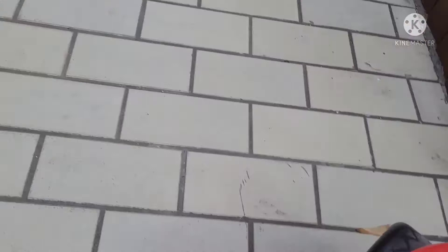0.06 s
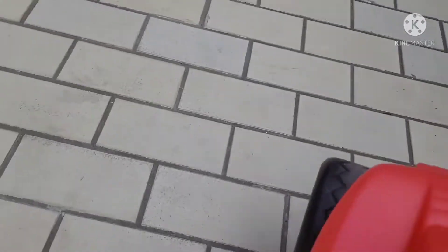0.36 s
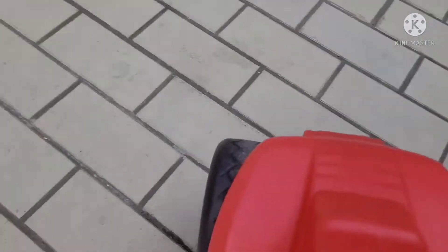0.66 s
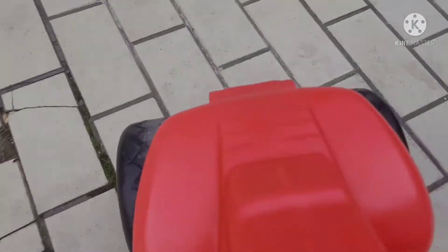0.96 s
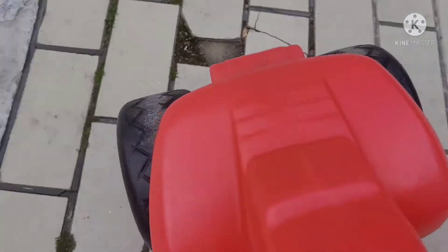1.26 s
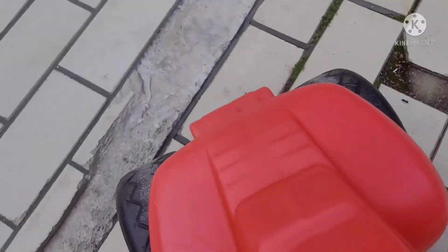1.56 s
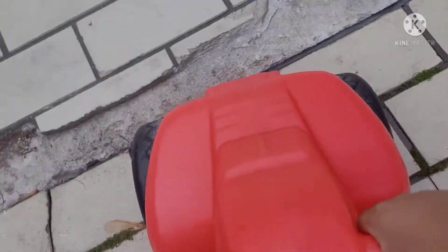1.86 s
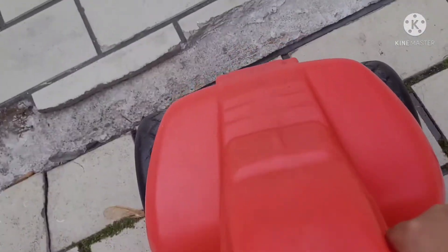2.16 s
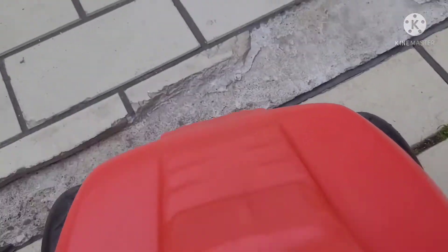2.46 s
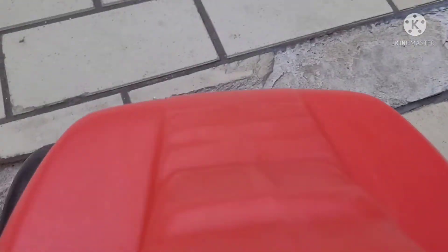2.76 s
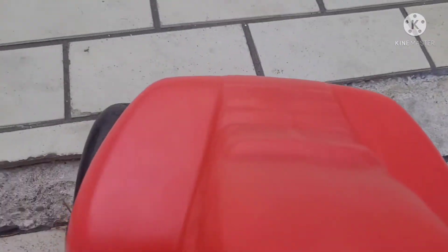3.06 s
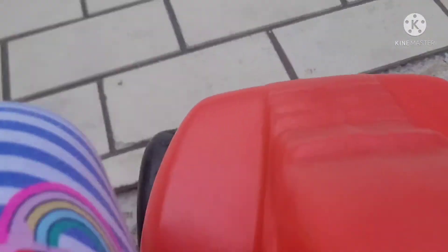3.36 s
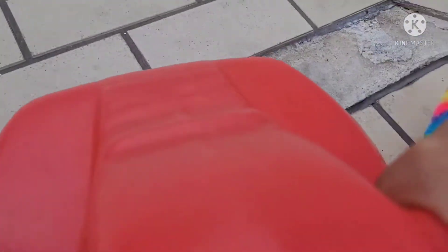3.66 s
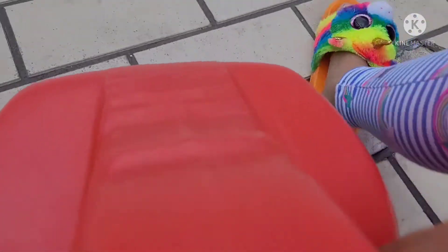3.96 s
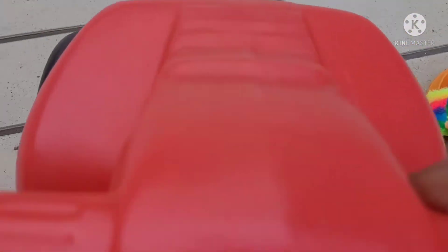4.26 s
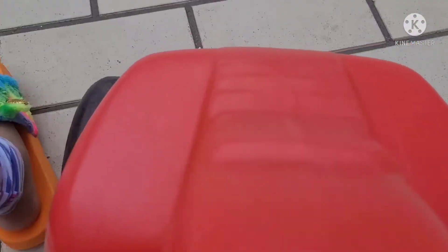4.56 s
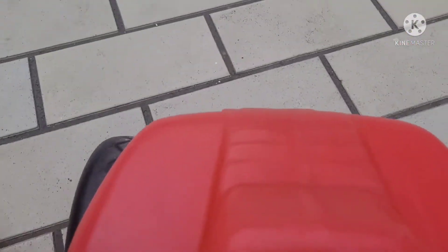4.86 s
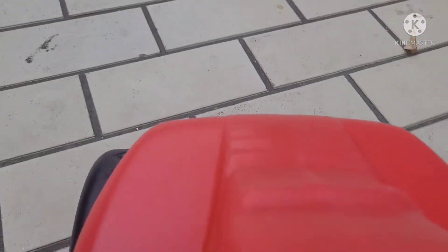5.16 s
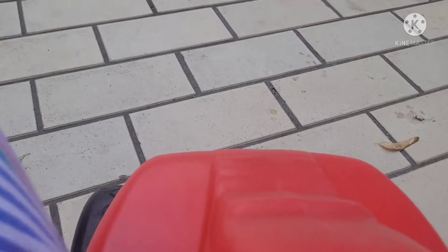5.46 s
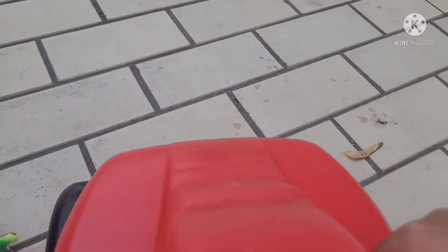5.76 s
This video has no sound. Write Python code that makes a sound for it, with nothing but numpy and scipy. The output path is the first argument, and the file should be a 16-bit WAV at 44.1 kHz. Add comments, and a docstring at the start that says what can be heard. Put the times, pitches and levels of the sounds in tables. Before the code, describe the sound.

A hollow plastic ride-on toy is pushed over paving tiles outdoors, heard from just above its bonnet. Its hard wheels rumble and rasp, then hit a joint with a loud hollow knock and an axle clack. The rolling eases while sandals scuff on grit, then picks up into a quick, uneven run of thuds and rattles. A breeze buffets the microphone over quiet outdoor air.

```python
"""A hollow plastic ride-on toy is pushed over paving tiles outdoors, heard from just above its bonnet.
Its hard wheels drum on the shell and knock at the joints, the body booms and loose axles clatter.
The treads rasp, and grit scrapes and cracks under wheels and sandals, all with a faint yard echo.
Behind it lies quiet outdoor air, and a breeze buffets the two microphone ports, each on its own."""
import sys
import numpy as np
from scipy import signal
from scipy.fft import rfft, irfft, next_fast_len
from scipy.io import wavfile
from scipy.ndimage import uniform_filter1d

SR = 44100
rng = np.random.default_rng(int(sys.argv[2]) if len(sys.argv) > 2 else 0)


def generate_wav(sig):
    """Save sig (samples, or channels by samples) to the path in sys.argv[1] as 16-bit PCM at SR."""
    pcm = np.round(np.clip(np.atleast_2d(sig).T, -1, 1) * 32767).astype(np.int16)
    wavfile.write(sys.argv[1], SR, pcm)


N = 260719
TIME = np.arange(N) / SR
RING = np.arange(SR // 3) / SR  # time axis of a single hit [s]

# wheels dropping into joints: (time [s], thud level [dB], thud centre [Hz], clatter level [dB],
# cavity boom level [dB], wheel clop level [dB], hop until the second landing [s])
KNOCKS = [(0.147, -25, 263, -44, -28, -33.5, 0.019), (0.734, -18.5, 300, -33.5, -45, -35, 0.00379),
          (0.925, -19.5, 295, -34.5, -43, -36.5, 0.021), (1.751, -12, 287, -32.5, -24, -30, 0.029),
          (2.006, -0.5, 440, -21.5, -18.5, -16, 0.015), (2.063, -13.5, 430, -36, -21.5, -26, .008),
          (2.609, -18.5, 236, -65, -24, -55, 0.026), (2.822, -44, 247, -58, -60, -44.5, 0.014),
          (3.158, -29, 430, -53.5, -55, -44.5, 0.02), (3.412, -38, 370, -54, -60, -48, 0.0038),
          (4.0, -7, 433, -37, -19, -27.5, .024), (4.103, -17, 230, -39, -28, -26.5, 0.0075),
          (4.127, -10.5, 365, -57, -17.5, -37, .01), (4.213, -15, 330, -45, -24.5, -43, .012),
          (4.322, -6.5, 398, -37.5, -17.5, -25.5, .014), (4.429, -26, 410, -52, -43, -51, 0.023),
          (4.582, -24, 360, -66, -41, -59, .01), (4.691, -20, 398, -44.5, -60, -46, .008),
          (4.767, -26.5, 343, -47, -50, -50, .01), (4.83, -13.5, 460, -40, -25, -34, 0.014),
          (4.886, -7, 335, -29, -9.5, -18, .018), (5.084, -19.5, 328, -46.5, -19.5, -41.5, 0.0097),
          (5.186, -23, 200, -47, -23.5, -56, 0.01), (5.255, -21, 440, -54, -42, -56, 0.0048),
          (5.307, -3.5, 320, -33.5, -31, -24.5, 0.0096), (5.439, -19.5, 340, -58, -42, -40, .012),
          (5.472, -9.5, 260, -41, -28, -24.5, 0.018), (5.549, -7.5, 360, -37, -19, -19, .012),
          (5.607, -6.5, 348, -30.5, -17, -10.5, 0.019), (5.833, -33, 237, -54, -60, -60, 0.021)]
# modes of the plastic shell, hollow wheels and stiff panels: (pitch [Hz], level [dB], free t60 [s])
SHELL_MODES = [(191.7, -16, 0.45), (238.3, 2, 0.12), (269.8, -10.5, 0.41), (330, -10, 0.26),
               (364.8, -3.5, 0.15), (394.4, 0.5, 0.08), (437.4, -4, 0.2), (487.3, -7.5, 0.15),
               (529, -10, 0.2), (610.2, -8.5, 0.15)]
WHEEL_MODES = [(664, 10, 0.12), (741, 2.5, 0.12), (737.7, -0.5, 0.32), (823, -1.5, 0.1), (927, -5, 0.12),
               (930, -9.5, 0.27), (1003, -20, 0.23)]
PANEL_MODES = [(988, 3, 0.26), (1081, -3, 0.48), (1220, -7, .1), (1360, 1.5, 0.25), (1553, -3, 0.097),
               (1562, 8.5, 0.091), (1620, -22, 0.02), (1850, -5, 0.51), (1953, 2.5, 0.16), (2240, -4, 0.18),
               (2485, -3, 0.057), (3300, -12, 0.077)]
# how hard the treads rub on the tiles: (time [s], level [dB])
TREAD_EFFORT = [(0.0, -50), (0.76, -52), (0.92, -45), (1.25, -57.5), (1.62, -46.5), (1.8, -42.5),
                (1.98, -46.5), (2.22, -55.5), (2.88, -64), (3.2, -61.5), (3.87, -64), (4.21, -54),
                (4.52, -64.5), (4.86, -43), (5.02, -55.5), (5.28, -61), (5.55, -50.5), (5.91, -64.5)]


def amp(db):
    """Decibels to gain."""
    return 10 ** (np.asarray(db) / 20)


def unit(x):
    """Scales to an rms of one."""
    return x / np.sqrt(np.mean(x ** 2) + 1e-20)


def follow(rows, column=1):
    """One column of an automation curve, at every sample."""
    rows = np.asarray(rows)
    return np.interp(TIME, rows[:, 0], rows[:, column])


def colour(x, points):
    """Shapes x with an EQ curve of (frequency [Hz], level [dB]) and scales it to an rms of one."""
    hz, db = np.transpose(points)
    size = next_fast_len(x.shape[-1])
    bins_hz = np.fft.rfftfreq(size, 1 / SR)
    gain = amp(np.interp(np.log(bins_hz + 1), np.log(hz), db))
    return unit(irfft(rfft(x, size) * gain, size)[..., :x.shape[-1]])


def noise(points, length=N):
    """Coloured noise, independent left and right."""
    return colour(rng.standard_normal((2, length)), points)


def steady(x, span_s):
    """Evens out swells longer than span_s."""
    width = int(span_s * SR) + 1
    power = uniform_filter1d(x ** 2, width)
    return x / np.sqrt(uniform_filter1d(power, width) + 1e-9)


def add(mix, s, sound):
    """Lays a stereo sound into the mix at s seconds."""
    part = mix[:, max(round(s * SR), 0):][:, :sound.shape[1]]
    part += sound[:, :part.shape[1]]


def dying(t60):
    """An exponential decay of 60 dB in t60 seconds."""
    return np.exp(-np.log(1000) * RING / np.maximum(t60, 1 / SR))


def grains(per_s, spread_db):
    """Clicks at random times, mostly small and a few large."""
    size = amp(spread_db * np.minimum(rng.exponential(1, N), 4))
    return size * rng.choice([-1, 1], N) * (rng.random(N) < per_s / SR)


def sand(points, per_s, spread_db, smooth):
    """Separate grains over a smooth bed of finer ones."""
    coarse = np.array([unit(grains(per_s, spread_db)) for side in range(2)])
    return colour(coarse + smooth * rng.standard_normal((2, N)), points)


def shifting(x, depth_db):
    """The contact point wanders, so narrow resonances come and go within some tens of milliseconds."""
    frames = dict(nperseg=512, noverlap=384)
    spectra = signal.stft(x, **frames)[2]
    patches = uniform_filter1d(rng.standard_normal(spectra.shape), 2, axis=1)
    patches = unit(uniform_filter1d(patches, 14, axis=2))
    return unit(signal.istft(spectra * amp(depth_db * patches), **frames)[1][:, :N])


def ring(modes, centre_hz, octaves, apart, bend, uneven_db=2):
    """Struck modes: the spot varies their weights, load bends their pitch, each port has its own phase."""
    hz, db, t60 = np.transpose(modes)[:, :, None]
    spot, phase, load = rng.standard_normal((3, len(modes), 1))
    weight = amp(db + uneven_db * spot) / (1 + (np.log2(hz / centre_hz) / octaves) ** 2)
    waves = weight * np.exp((2j * np.pi * hz * (1 + bend * load) - np.log(1000) / t60) * RING)
    return np.array([(waves * np.exp(1j * side * apart * phase)).sum(0).imag for side in (-1, 1)])


def blow(wave, rise_s, lost_t60, kept):
    """Contact builds the vibration up; the ground soaks up part of it at once and a share rings on."""
    attack = 1 - np.exp(-(RING / rise_s) ** 2)
    wave = wave * attack * (dying(lost_t60) + kept)
    return wave / abs(wave).max()


def outdoor_air():
    """A quiet, even bed of open air."""
    air_eq = [(40, 7), (200, -15), (600, 0), (1500, -11), (3000, -5), (6000, -8.5), (15000, -12)]  # low rumble and thin hiss: (frequency [Hz], level [dB])
    return amp(-63.5) * noise(air_eq)


def yard(x, level_db=-17, t60=0.24, echoes_per_s=2000):
    """Adds faint scattered echoes from the ground and nearby walls."""
    taps = rng.standard_normal((2, len(RING))) * (rng.random((2, len(RING))) < echoes_per_s / SR)
    taps *= dying(t60) * (RING > .006)
    return x + amp(level_db) * signal.oaconvolve(x, taps / np.linalg.norm(taps[0]), axes=1)[:, :N]


def airflow(flutter_db=2.5, jolt_db=-24.5, jolt_rise_s=.02):
    """Level in dB of the air at each port: the unsteady breeze plus the jolt of every knock."""
    gusts = [(0.0, -29.5, 3.5), (0.72, -33, -12), (1.17, -37.5, -6), (1.43, -37, -4.5), (1.55, -25, 5),
             (1.92, -25.5, 7.5), (2.22, -35, 6), (2.68, -24, 2.5), (2.81, -39.5, -8.5), (3.27, -37, 3.5),
             (3.36, -59.5, 39.5), (3.55, -52.5, 38), (3.68, -45.5, 11), (4.4, -40.5, -2), (4.55, -59.5, 28),
             (4.68, -38.5, -2), (5.62, -49, 8), (5.74, -62, -5)]  # breeze at the ports: (time [s], level [dB], left minus right [dB])
    flutter = noise([(1, -10), (4, 0), (10, 0), (25, -40), (100, -100)])
    side_db = np.array([[.5], [-.5]]) * follow(gusts, column=2)
    power = amp(follow(gusts) + side_db + flutter_db * flutter) ** 2
    for s, db, *_ in KNOCKS:
        age = np.maximum(TIME - s, 0) / jolt_rise_s
        power += (amp(db + jolt_db) * age * np.exp(1 - age)) ** 2
    return 10 * np.log10(power)


def wind(level_db=1, eddy_db=-7, strong_db=-28, eddy_growth=1.91, lump_db=3):
    """Each port has its own buffeting; strong gusts shed smaller eddies that flutter higher up."""
    # deep buffeting and smaller eddies: (frequency [Hz], level [dB])
    rumble_eq = [(15, -17), (30, -28), (48, 2.5), (70, 0), (110, -3), (170, -19), (270, -14), (400, -29.5),
                 (700, -65.5), (2000, -106.5)]
    eddy_eq = [(50, -24), (110, 14), (190, 5.5), (300, 8.5), (450, -15.5), (800, -38), (2000, -44),
               (6000, -78)]
    port_db = airflow()
    rumble = steady(noise(rumble_eq), span_s=0.035)
    lumps = noise([(5, -12), (15, 0), (45, 0), (120, -40), (400, -90)])
    eddies = steady(noise(eddy_eq) * amp(lump_db * lumps), span_s=0.37)
    shed_db = strong_db + eddy_growth * (port_db - strong_db)
    return amp(level_db + port_db) * rumble + amp(eddy_db + shed_db) * eddies


def puffs(level_db=-5, swell_s=0.003):
    """An eddy hits a port: a quick push of pressure, then a suck."""
    hits = [(0.206, -15.5, -1), (0.428, -21.5, -23), (0.497, -8.5, -21), (0.525, -13, -10),
            (0.765, -15, -18), (0.822, -13.5, -4), (1.279, -12, 14), (1.298, -7.5, -19),
            (1.372, -12.5, -32), (1.518, -8, 14), (1.615, -2.5, 24), (1.837, -10.5, -7), (2.262, -16, -0.5),
            (2.386, -8.5, -24), (2.457, -15.5, 7), (2.557, -10.5, 21), (2.958, -23, 2), (3.24, -16, -14)]  # wind pops: (time [s], level [dB], left minus right [dB])
    out = np.zeros((2, N))
    for (s, db, pan_db), size in zip(hits, rng.uniform(.75, 1.25, (len(hits), 2, 1))):
        age = RING / (swell_s * size)
        push = np.sin(2 * age) * age * np.exp(1 - age)
        pan = unit(amp(np.array([[.5], [-.5]]) * pan_db))
        add(out, s, amp(db + level_db) * pan * push)
    return out


def sliding(dust_db=-15):
    """How much sand slides: a little under every rolling tread, much more in a skid."""
    # a wheel slips sideways: (time of the height [s], level [dB], build-up [s], fade [s])
    skids = [(0.46, -61.5, .15, 0.042), (0.94, -46, 0.068, 0.043), (1.48, -58, 0.04, 0.33),
             (1.77, -50, 0.014, 0.19), (1.94, -50.5, .05, 0.081), (2.405, -60, 0.019, .025),
             (2.72, -59, 0.028, .06), (2.85, -62.5, 0.04, 0.049), (3.18, -66, 0.09, 0.094),
             (3.521, -50, 0.041, .06), (3.87, -62, 0.1, 0.18), (4.32, -62, 0.24, 0.12),
             (4.47, -57.5, 0.021, 0.047), (4.865, -46, 0.085, 0.063), (5.32, -60.5, 0.23, 0.27),
             (5.6, -64, 0.18, 1)]
    power = amp(dust_db + follow(TREAD_EFFORT)) ** 2
    for s, db, build_s, fade_s in skids:
        swell = np.exp(np.minimum((TIME - s) / build_s, (s - TIME) / fade_s))
        power += (amp(db) * swell) ** 2
    return np.sqrt(power)


def grit(scrape_db=6.0, crunch_db=4.5):
    """Sliding sand hisses and larger grains crack under a wheel or sole, some dull, some bright."""
    grit_eq = [(500, -20), (1600, -1), (3000, 1.5), (5000, 1), (7000, -1), (10000, -2), (12000, 0),
               (15800, -2)]  # bright sandy hiss: (frequency [Hz], level [dB])
    crunches = [(0.031, -48.5, 0.12, 4570), (0.155, -48.5, 0.15, 3500), (0.693, -49, 0.011, 6000),
                (0.729, -45.5, 0.07, 800), (.791, -34.5, 0.23, 800), (1.0507, -41, 0.025, 2500),
                (1.749, -44, 0.12, 1500), (1.905, -35.5, 0.15, 7100), (2.2865, -39, 0.009, 6500),
                (2.516, -48, 0.02, 6500), (3.723, -51, 0.016, 2000), (3.841, -49, 0.025, 2000),
                (3.878, -55, .03, 1500), (4.101, -51, 0.055, 3000), (4.46, -39, 0.022, 3000),
                (4.859, -31, 0.045, 4000), (4.961, -47.5, 0.092, 4000), (5.539, -40.5, 0.0084, 5000),
                (5.606, -48, 0.025, 1500)]  # cracking grains: (time [s], level [dB], t60 [s], low cut [Hz])
    splinters = sand(grit_eq, per_s=6000, spread_db=4, smooth=1)
    cracks = np.zeros((2, N))
    for s, db, t60, low_hz in crunches:
        start = rng.integers(N - len(RING))
        burst = splinters[:, start:start + len(RING)] * dying(t60) * (1 - dying(0.0017))
        low_cut = signal.butter(2, low_hz, "high", fs=SR, output="sos")
        add(cracks, s, amp(db + crunch_db) * signal.sosfilt(low_cut, burst))
    scrape = shifting(sand(grit_eq, per_s=400, spread_db=2, smooth=1.2), depth_db=2.5)
    return amp(scrape_db) * sliding() * scrape + cracks


def scuffs_and_snaps():
    """Soles scuff the gritty tiles, and twice a wheel gives a short snap as it meets a joint."""
    bursts = [(1.48, -41.5, 0.046), (2.416, -51, 0.042), (2.732, -50, 0.098), (2.83, -52, 0.028),
              (3.524, -42, 0.069), (3.588, -43, 0.041), (3.806, -49, 0.029), (3.876, -46, 0.072),
              (3.95, -53, 0.039), (3.994, -36, 0.0079), (4.315, -35.5, 0.0085), (4.473, -38.5, 0.028),
              (4.814, -39, 0.034)]  # sole scuffs and two snaps: (time of the middle [s], level [dB], length [s])
    contact_eq = [(300, 21), (700, 16), (1500, 3.5), (2600, 9.5), (4500, 7), (6500, -4), (10000, -10),
                  (16000, -31)]  # gritty contact with tile: (frequency [Hz], level [dB])
    envelope = sum(amp(db) * np.exp(-(2 * (TIME - s) / length) ** 2) for s, db, length in bursts)
    return envelope * shifting(sand(contact_eq, per_s=940, spread_db=5.0, smooth=0.45), depth_db=5.0)


def treads(level_db=1, grind_db=-6, hard_db=-45):
    """The hard treads rasp on the tiles; pressed hard, they grind."""
    # midrange rasp, and the grind of a wheel forced sideways: (frequency [Hz], level [dB])
    rasp_eq = [(200, -25.5), (500, 6), (1000, 3.5), (1900, -0.5), (2800, -7.5), (4500, -13.5), (8000, -37),
               (16000, -42)]
    grind_eq = [(900, -15), (1520, -18.5), (2050, -4.5), (2680, 3), (3300, -9), (6000, -32)]
    effort_db = follow(TREAD_EFFORT)
    rasp = shifting(sand(rasp_eq, per_s=900, spread_db=3.2, smooth=.8), depth_db=3.5)
    grind = shifting(sand(grind_eq, per_s=500, spread_db=3.5, smooth=.4), depth_db=4)
    grind_gain = amp(grind_db + np.minimum(effort_db - hard_db, 0))
    return amp(level_db + effort_db) * (rasp + grind_gain * grind)


def cavity(hz=151.7, t60=0.23):
    """The air in the hollow body booms at one low pitch."""
    return np.sin(2 * np.pi * hz * RING) * dying(t60)


def rolling(wheel_db=-12, panel_db=-24, cavity_db=-9, spots=8):
    """Small bumps drum on the wheels; each spot of contact shakes the body in its own way."""
    push = [(0.0, -41.5), (0.17, -48), (0.86, -51.5), (1.35, -57), (1.7, -38.5), (1.92, -34), (2.13, -33.5),
            (2.33, -66.5), (2.6, -39), (2.82, -54), (3.7, -53.5), (4.16, -33.5), (4.42, -38.5),
            (4.58, -58.5), (4.82, -31), (5.03, -43), (5.53, -26), (5.72, -41)]  # drumming, following how hard the toy is pushed: (time [s], level [dB])
    out = np.zeros((2, N))
    for _ in range(spots):
        shell = ring(SHELL_MODES, 420, octaves=.9, apart=.25, bend=.04)
        wheel = ring(WHEEL_MODES, 720, octaves=1.4, apart=.8, bend=.04)
        panels = ring(PANEL_MODES, 1500, octaves=2, apart=1.3, bend=.04)
        plastic = unit(shell) + amp(wheel_db) * unit(wheel) + amp(panel_db) * unit(panels)
        body = plastic * dying(.16) + amp(cavity_db) * unit(cavity())
        bump = blow(body, rise_s=0.0017, lost_t60=0.021, kept=1.0)
        out += signal.oaconvolve(grains(per_s=45, spread_db=3.5)[None], bump, axes=1)[:, :N]
    return amp(follow(push)) * steady(unit(out), span_s=0.51)


def axle_clacks(level_db=1):
    """The loose axle slaps the stiff panels and damps them at once; they reach the ports out of step."""
    slaps = [(0.1455, -25, 1040), (2.0053, -17.5, 1000), (2.021, -9.5, 1000), (2.065, -27.5, 974),
             (4.0002, -38, 950), (4.1, -30, 950), (4.132, -24, 1500), (4.3235, -26, 1060),
             (4.8615, -31.5, 1030), (4.904, -37, 1110), (5.316, -30, 1150), (5.473, -51, 1010),
             (5.5508, -34, 960), (5.5945, -30, 1670), (5.6056, -14.5, 990), (5.61, -22.5, 1590)]  # axle on panel: (time [s], level [dB], centre of the blow [Hz])
    out = np.zeros((2, N))
    for s, db, hz in slaps:
        panels = ring(PANEL_MODES, hz, octaves=.5, apart=.9, bend=.02) * dying(.25)
        add(out, s, amp(db + level_db) * blow(panels, rise_s=0.00019, lost_t60=0.074, kept=1.0))
    return out


def landings(thud_db=-3, parts_db=-6.5, boom_db=-7, brighter=1.1):
    """Every knock, and the softer, slightly brighter second landing after the wheel's hop."""
    for s, db, hz, rattle_db, cavity_db, clop_db, hop_s in KNOCKS:
        yield s, db, hz, rattle_db, cavity_db, clop_db
        yield (s + hop_s, db + thud_db, hz * brighter,
               rattle_db + parts_db, cavity_db + boom_db, clop_db + parts_db)


def wheel_knocks(boom_db=-2, wheel_db=3, clatter_db=6, snap_db=2):
    """A wheel hits a joint: contact snaps, shell thuds, cavity booms, wheel clops, loose parts clatter."""
    clatter_eq = [(400, -16), (800, 4), (1400, 5.5), (2400, 3.5), (3600, -4.5), (6000, -16), (10000, -21.5),
                  (16000, -32)]  # rattling loose parts: (frequency [Hz], level [dB])
    out = np.zeros((2, N))
    for s, db, hz, rattle_db, cavity_db, clop_db in landings():
        shell = ring(SHELL_MODES, hz, octaves=.6, apart=.15, bend=.03)
        wheel = ring(WHEEL_MODES, 740, octaves=1.5, apart=.35, bend=.03, uneven_db=2.5)
        hiss = noise(clatter_eq, len(RING))
        steps_db = 4 * rng.standard_normal(len(RING) // 128 + 1)  # a new level about every 3 ms
        chatter = np.repeat(amp(steps_db), 128)[:len(RING)]
        thud = blow(shell, rise_s=0.0027, lost_t60=0.031, kept=0.47)
        clop = blow(wheel * dying(.4), rise_s=0.0031, lost_t60=0.11, kept=1.9)
        clatter = blow(hiss * chatter * dying(0.24), rise_s=0.00045, lost_t60=0.16, kept=0.94)
        snap = blow(hiss[:, ::-1], rise_s=0.0005, lost_t60=0.02, kept=0)
        add(out, s - .0015, amp(rattle_db + snap_db) * snap)
        add(out, s - .001, amp(rattle_db + clatter_db) * clatter)
        add(out, s - .0005, amp(db) * thud + amp(cavity_db + boom_db) * cavity())
        add(out, s + .001, amp(clop_db + wheel_db) * clop)
    return out


def scene():
    """The toy in the yard, wind on the microphone and quiet outdoor air."""
    air = outdoor_air()
    ride = wheel_knocks() + axle_clacks() + rolling() + treads() + grit() + scuffs_and_snaps()
    return yard(ride) + wind() + puffs() + air


def record(dry, high_cut_hz=15850):
    """Clips at full scale, then cuts the highest treble."""
    high_cut = signal.firwin(401, high_cut_hz, window=("kaiser", 8), fs=SR)
    return signal.oaconvolve(np.clip(dry, -1, 1), high_cut[None], "same")


dry = scene()
out = record(dry)
generate_wav(out)
```